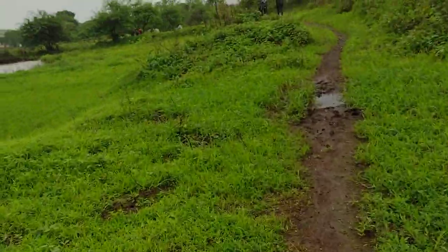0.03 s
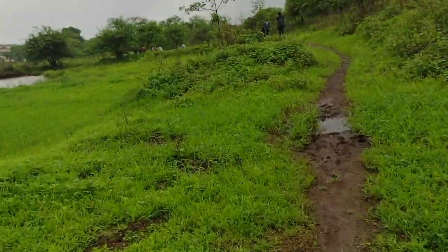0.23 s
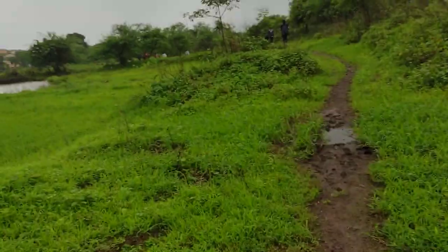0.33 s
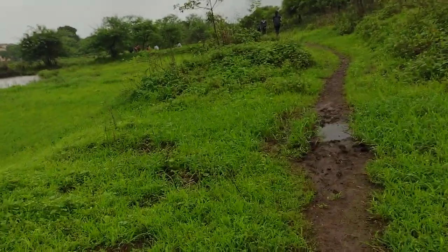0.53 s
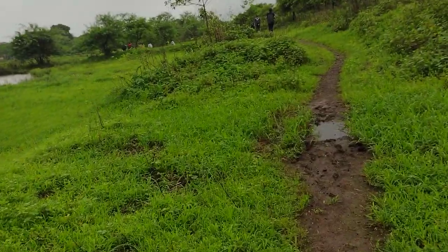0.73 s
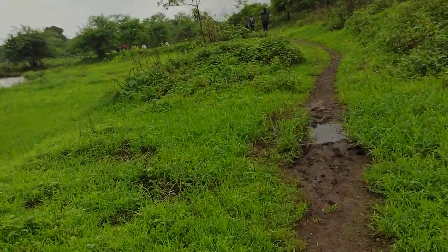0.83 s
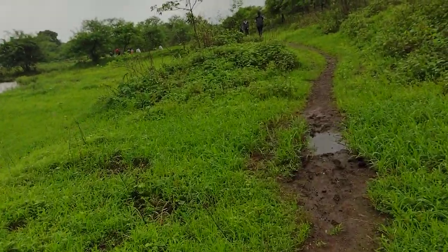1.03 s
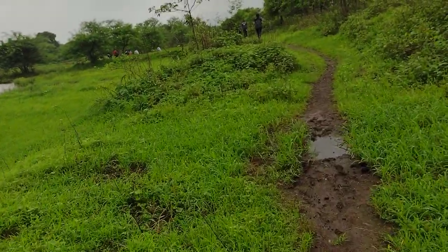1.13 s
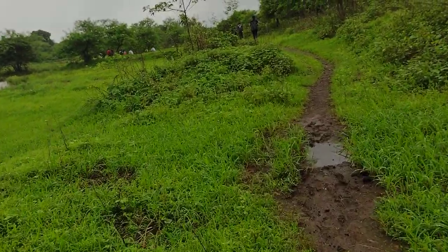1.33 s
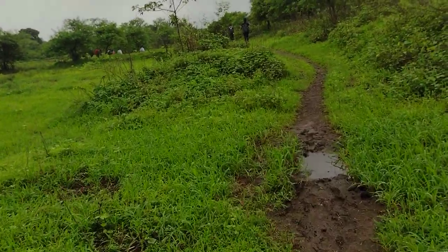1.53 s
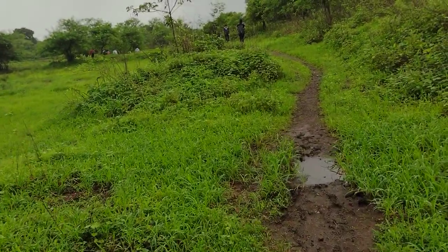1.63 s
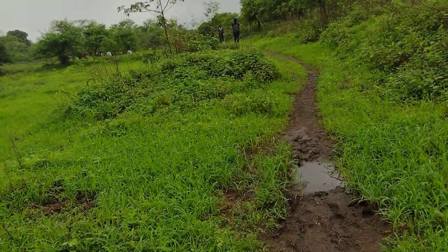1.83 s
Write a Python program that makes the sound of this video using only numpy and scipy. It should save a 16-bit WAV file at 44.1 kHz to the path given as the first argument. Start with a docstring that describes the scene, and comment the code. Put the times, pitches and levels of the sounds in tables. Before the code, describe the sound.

Boots squelching along a muddy path, three wet steps in a light, steady wind.

```python
"""A wet mud path through grass: three steps, heard from the walker's hand.
Each boot slaps the mud and squeezes out a crackling spray, while trapped air pops and plops
and films of wet mud snap. Legs swish through the grass over a soft, steady wind.
The microphone's two openings (ports) each cut a row of notches into the sound, like a comb."""
import sys
import numpy as np
from scipy import signal
from scipy.fft import rfft, irfft, next_fast_len
from scipy.io import wavfile
from scipy.ndimage import map_coordinates

SR = 44100
rng = np.random.default_rng(int(sys.argv[2]) if len(sys.argv) > 2 else 0)


def wav_out(sig):
    """Save sig, one row per channel (or a flat mono array), as 16-bit PCM at SR to the path in sys.argv[1]."""
    wavfile.write(sys.argv[1], SR, np.round(np.clip(np.atleast_2d(sig).T, -1, 1) * 32767).astype(np.int16))


N = 83790  # 1.9 seconds

# The mud's four ranges, from low to high (thud, squelch, crackle, spray): low_hz, high_hz
MUD_BANDS = [(190, 484), (550, 1980), (2650, 3830), (5900, 9500)]
# A boot pressing into mud. Here and below, fade_s is the time to die away by 60 dB.
# start_s, rise_s, fade_s, thud_db, squelch_db, crackle_db, spray_db
BOOT_PRESSES = [ (.224, 0.012, .12, -86, -36, -45, -43.5), (.282, 0.0064, 0.035, -27, -28, -28, -37.5),
                (0.297, 0.0065, 0.091, -44, -37, -45, -54), (0.77, 0.028, 0.21, -42.5, -38, -37, -40.5),
                (.831, 0.0051, 0.078, -40.5, -28.5, -20, -28), (0.844, .018, 0.27, -43.5, -37.5, -34, -40),
                (1.409, 0.014, 0.068, -47, -35, -41.5, -47), (1.453, 0.0083, 0.3, -60, -42.5, -49.5, -50.5)]


def squelches():
    """The sole squeezes water and grit out of the mud."""
    envelopes = [swell_and_fade(*row[:3]) for row in BOOT_PRESSES]
    levels_db = [row[3:] for row in BOOT_PRESSES]
    return shape_in_bands(grainy_noise(depth_db=1.5), envelopes, levels_db, MUD_BANDS)


# Air pockets bursting: start_s, pitch_hz, level_db, fade_s
POPS = [ (0.2827, 1770, -22, 0.041), (0.2891, 1532, -11.5, 0.019), (.2920, 660, -11.5, 0.015),
        (0.2904, 271, -26.5, 0.0078), (.2880, 3540, -24, 0.026), (0.2903, 1120, -22.5, 0.037),
        (0.4084, 688, -28, 0.036), (.4230, 682, -33, 0.029), (.4280, 683, -37, 0.037),
        (0.731, 3375, -20, 0.014), (0.742, 3340, -32, 0.012), (0.8324, 3050, -27.5, 0.037),
        (0.8387, 434, -27.5, 0.077), (.865, 1990, -35, 0.11), (0.9791, 687, -31.5, 0.023),
        (1.052, 734, -40.5, .035), (1.4229, 1130, -42.5, 0.076), (1.463, 1933, -33.5, 0.029),
        (1.5685, 676, -34.5, 0.025), (1.581, 628, -37, 0.034)]


def air_pockets():
    """Each trapped air pocket rings briefly as it opens, its pitch sinking as it fades."""
    pitch_drop = 0.085  # share of the starting pitch
    out = np.zeros(N)
    for start_s, pitch_hz, level_db, fade_s in POPS:
        t = np.maximum(since(start_s), 0)
        sinking_hz = pitch_hz * (1 - pitch_drop * np.minimum(t / fade_s, 1)) * (t > 0)
        tone = np.sin(2 * np.pi * np.cumsum(sinking_hz) / SR)
        out += amp(level_db) * swell_and_fade(start_s, rise_s=0.0009, fade_s=fade_s) * tone
    return out


# Small wet clicks: start_s, rise_s, fade_s, squelch_db, crackle_db, spray_db
MUD_SNAPS = [ (0.125, 0.0022, 0.017, -45, -49, -63), (0.149, 0.0027, 0.027, -42, -53, -50.5),
             (.260, 0.0055, 0.031, -39, -32.5, -33.5), (.329, 0.0039, 0.071, -39, -37.5, -43.5),
             (.343, .002, 0.048, -39.5, -44, -54), (0.554, 0.0036, 0.091, -45, -44.5, -66),
             (0.732, 0.00076, .012, -29, -30, -29.5), (0.738, 0.0024, .02, -39, -43, -40),
             (0.988, 0.0029, .03, -40, -42.5, -61), (1.348, 0.00092, 0.022, -40, -54.5, -61),
             (1.424, 0.0022, 0.03, -33, -38, -58), (1.509, .003, 0.022, -48, -42.5, -48),
             (1.567, 0.0024, 0.036, -44, -60, -56)]


def wet_clicks():
    """Films of wet mud snap around the boot, with no low thud."""
    envelopes = [swell_and_fade(*row[:3]) for row in MUD_SNAPS]
    levels_db = [row[3:] for row in MUD_SNAPS]
    return shape_in_bands(grainy_noise(depth_db=2.1), envelopes, levels_db, MUD_BANDS[1:])


# The grass's three ranges (rustle, hiss, fine hiss): low_hz, high_hz
SWISH_BANDS = [(550, 1870), (2800, 3930), (5600, 10900)]
# A leg brushing the grass: peak_s, half_length_s, rustle_db, hiss_db, fine_hiss_db
LEG_BRUSHES = [(0.016, 0.064, -54, -56.5, -55), (0.255, .05, -50, -52, -53), (0.352, 0.16, -54.5, -55, -56),
               (0.581, 0.012, -46, -52, -50.5), (0.723, 0.078, -56, -58, -61.5),
               (0.972, 0.078, -52.5, -53, -56), (1.264, 0.068, -54, -53, -52), (1.45, 0.1, -50, -55, -56),
               (1.847, 0.017, -54.5, -63, -63)]


def grass_swishes():
    """The swinging leg brushes the grass in soft swells."""
    envelopes = [np.exp(-(since(peak_s) / half_length_s) ** 2 / 2)
                 for peak_s, half_length_s, *_ in LEG_BRUSHES]
    levels_db = [row[2:] for row in LEG_BRUSHES]
    return shape_in_bands(grainy_noise(depth_db=2.5), envelopes, levels_db, SWISH_BANDS)


def ground_echo(sound, fade_s=0.12):
    """Ground and grass throw back a very short, blurred echo, different at each port."""
    t = np.arange(SR // 4) / SR
    tail = rng.standard_normal((2, len(t))) * np.exp(-np.log(1000) * t / fade_s)
    return signal.fftconvolve(sound[None], tail / np.linalg.norm(tail[0]), axes=1)[:, :N]


# The wind's tone, from bass to treble: frequency_hz, relative_db
WIND_TONE = [(25, -13), (60, -11.5), (100, -1.5), (160, 4), (300, 1), (700, -0.5), (1400, -6.5), (2200, -6),
             (3400, -10.5), (4600, -15.5), (6000, -12), (10000, -18.5), (15500, -27)]
# Wind that only one port hears, next to the wind both share: frequency_hz, relative_db
UNSHARED_WIND = [(30, -2), (200, -20), (1500, -7), (4000, -35), (9000, -11), (15000, -5)]


def wind(level_db=-52):
    """Soft, steady wind blows over the meadow, a little different at each port."""
    shared, *own = filtered(rng.standard_normal((3, N)), lambda hz: amp(curve_at(WIND_TONE, hz)))
    left_right = shared + filtered(np.array(own), lambda hz: amp(curve_at(UNSHARED_WIND, hz)))
    wander_db = 0.4 * wobble(rate_hz=5.2)
    flutter_db = 0.4 * wobble(rate_hz=44.65)
    return unit(left_right) * amp(level_db + wander_db + flutter_db)


def amp(db):
    """Turn decibels into a number to multiply by."""
    return 10 ** (np.asarray(db) / 20)


def unit(sound):
    """Scale a sound to an average strength (rms) of 1."""
    return sound / np.sqrt(np.mean(sound ** 2) + 1e-20)


def curve_at(points, hz):
    """Read between (frequency, value) points, with octaves evenly spaced."""
    point_hz, values = np.transpose(points)
    return np.interp(np.log(hz + 1), np.log(point_hz + 1), values)


def since(start_s):
    """Seconds since start_s, for every sample."""
    return np.arange(N) / SR - start_s


def swell_and_fade(start_s, rise_s, fade_s):
    """An envelope (loudness over time) that swells, then dies away."""
    t = since(start_s)
    swell = np.clip(t / rise_s, 0, 1) ** 2
    return swell * np.exp(-np.log(1000) * np.maximum(t - rise_s, 0) / fade_s)


def wobble(rate_hz):
    """A smooth curve through rate_hz random values a second."""
    return map_coordinates(rng.standard_normal(N // 4), [np.arange(N) * rate_hz / SR], mode="wrap")


def grainy_noise(depth_db):
    """Noise whose level flickers so fast that it clumps into tiny grains."""
    return unit(rng.standard_normal(N) * amp(depth_db * wobble(rate_hz=1800)))


def shape_in_bands(noise, envelopes, levels_db, bands):
    """Make noise follow each event's envelope, at that event's own level in each frequency range."""
    out = np.zeros(N)
    for (low_hz, high_hz), band_db in zip(bands, np.transpose(levels_db)):
        level = np.sqrt(amp(band_db) ** 2 @ np.array(envelopes) ** 2)  # events add up in power
        bandpass = signal.butter(2, [low_hz, high_hz], "bandpass", fs=SR, output="sos")
        width_gain = np.sqrt(SR / 2 / (high_hz - low_hz))  # makes up for what the filter removes
        out += signal.sosfilt(bandpass, noise * level) * width_gain
    return out


def filtered(sound, response):
    """Scale and delay each frequency of a sound as response(hz) says."""
    size = next_fast_len(N + SR // 2)
    hz = np.fft.rfftfreq(size, 1 / SR)
    return irfft(rfft(sound, size) * response(hz), size)[..., :N]


def scene():
    """The steps lie straight below the microphone, the wind all around."""
    steps = squelches() + wet_clicks() + air_pockets() + grass_swishes()
    return steps + amp(-20.5) * ground_echo(steps) + wind()


# The microphone's ports, left then right: notch_spacing_hz, notch_depth (0 to 1), gain_db
MIC_PORTS = [(2539, .8, -4.05), (2363, 0.78, -0.54)]
# Extra level on the left compared with the right: frequency_hz, extra_db
LEFT_OVER_RIGHT = [(1100, 1), (1600, 6.5), (2000, 8.5), (2700, 0), (8000, 1.5), (14000, 1.5)]


def record(dry):
    """Each port subtracts a slightly delayed copy, and the bass is lifted; the recorder cuts rumble and top."""
    def response(hz, lift_below_hz=481, lift_full_hz=97, low_cut_hz=42, high_cut_hz=15850):
        ports = []
        for (spacing_hz, depth, gain_db), side in zip(MIC_PORTS, (0.5, -0.5)):
            delayed_copy = depth * np.exp(-2j * np.pi * hz / spacing_hz)
            comb = (1 - delayed_copy) / np.sqrt(1 + depth ** 2)
            ports.append(amp(gain_db + side * curve_at(LEFT_OVER_RIGHT, hz)) * comb)
        bass_lift = (lift_below_hz + 1j * hz) / (lift_full_hz + 1j * hz)
        rumble_cut = 1j * hz / (low_cut_hz + 1j * hz)
        return np.array(ports) * bass_lift * rumble_cut * (hz < high_cut_hz)
    return filtered(dry, response)


dry = scene()
out = record(dry)
wav_out(out)
```